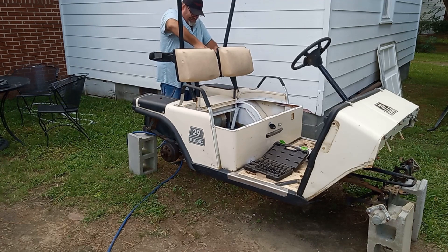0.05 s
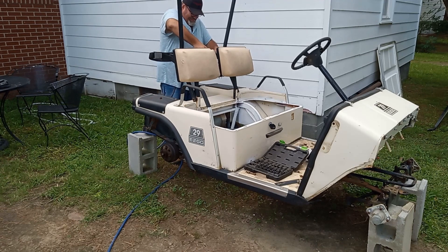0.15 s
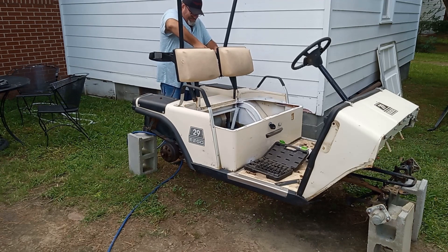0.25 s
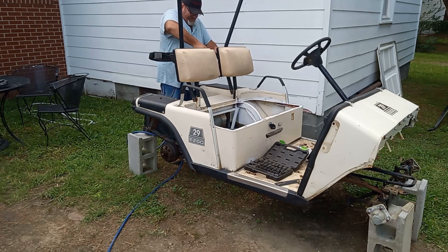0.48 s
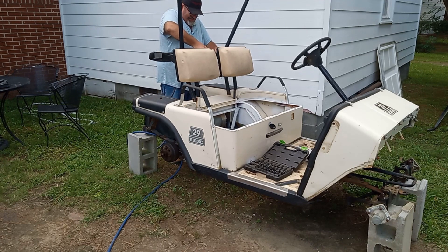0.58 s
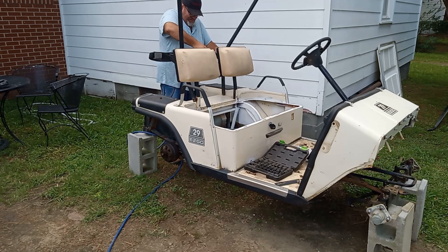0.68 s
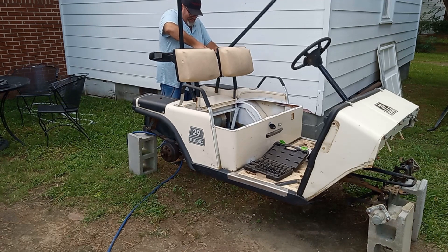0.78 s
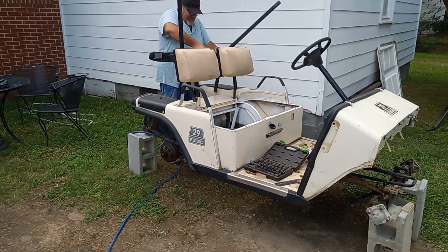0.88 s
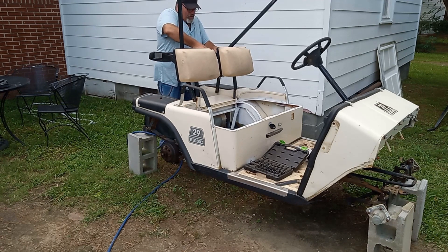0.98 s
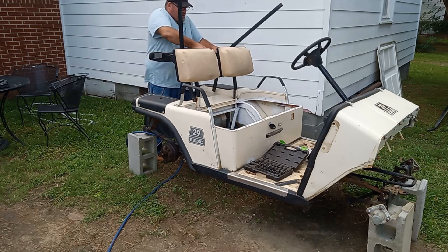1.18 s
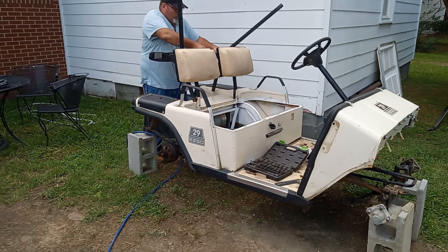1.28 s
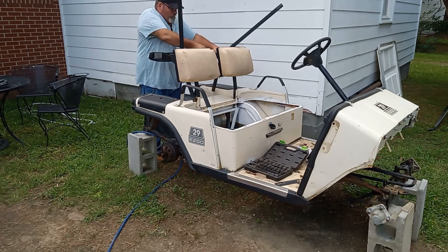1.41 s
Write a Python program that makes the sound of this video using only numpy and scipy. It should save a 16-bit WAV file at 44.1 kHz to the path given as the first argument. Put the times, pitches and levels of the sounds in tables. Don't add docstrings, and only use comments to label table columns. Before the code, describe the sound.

Steel rasps in its bracket, cracks loose and rattles the cart's panels; after a pause it thuds the drummy body, then taps it lightly. Insects hiss, distant machinery hums, and a nearby wall reflects the sound.

```python
import sys
import numpy as np
from scipy import signal
from scipy.fft import rfft, irfft
from scipy.io import wavfile
from scipy.ndimage import uniform_filter1d

SR = 44100
rng = np.random.default_rng(int(sys.argv[2]) if len(sys.argv) > 2 else 0)


def dump_mix(stems):
    frames = np.atleast_2d(stems).T
    limited = np.clip(frames, -1, 1)
    pcm = np.round(limited * 32767).astype(np.int16)
    wavfile.write(sys.argv[1], SR, pcm)


def boost(x):
    u = np.asarray(x, float) / 20
    return 10 ** u


N = 63945

SNAP_S, SWUNG_S, NUDGE_S = 0.287, 0.8, 1.293
HIT_SIZE = 12


def evened(x):
    return x / np.sqrt(np.mean(x ** 2) + 1e-20)


def read(points, hz):
    f, value = np.transpose(points)
    return np.interp(np.log(hz + 1), np.log(f + 1), value)


def slow_drift(hz):
    noise = rng.standard_normal(N + SR)
    return evened(signal.lfilter(*signal.butter(N=2, Wn=hz, fs=SR), noise)[SR:])


def noise_band(hz, width):
    r = np.exp(-np.pi * width / SR)
    z = rng.standard_normal((2, N)) + 1j * rng.standard_normal((2, N))
    for _ in range(2):
        z = signal.lfilter([1], [1, -r], z)
    return evened((z * np.exp(2j * np.pi * hz * np.arange(N) / SR)).real)


# (frequency [Hz], level [dB])
AIR_COLOUR = [(18, -31), (30, -6), (149, 2), (210, -10), (1040, -12), (5310, -34), (6720, -11.5),
              (7700, -53.5), (16000, -35.5)]
# (frequency [Hz], likeness [-1 to 1])
AIR_LIKENESS = [(60, 0.98), (240, 0.91), (950, -0.37), (3770, 0.23), (15000, 0.74)]


def air():
    hz = np.fft.rfftfreq(N + 1, 1 / SR)
    a, b = rfft(rng.standard_normal((2, N + 1)))
    same = np.clip(read(AIR_LIKENESS, hz), -1, 1)
    z = np.array([a, same * a + np.sqrt(1 - same ** 2) * b]) * boost(read(AIR_COLOUR, hz))
    middle = irfft(z[0] * ((hz > 200) & (hz < 5000))).std()
    return boost(-65) * irfft(z)[:, :N] / middle


# (frequency [Hz], width [Hz], level [dB])
HUM_LINES = [(72.4, 16, 1), (117.4, 17, -11.5), (146.4, 8.9, -7)]
# (time [s], level [dB])
HUM_SWELLS = [
    (0.0, -33.5),
    (0.068, -81),
    (0.188, -50),
    (0.35, -78),
    (0.532, -69.5),
    (0.836, -64.5),
    (0.968, -71),
    (1.21, -60.5),
    (1.352, -69),
    (1.45, -75),
]


def hum():
    s, level_db = np.transpose(HUM_SWELLS)
    lines = sum(boost(db) * noise_band(hz, width)[0] for hz, width, db in HUM_LINES)
    return lines * boost(np.interp(np.arange(N) / SR, s, level_db))


CRICKET_S, CRICKET_RISE_S = 1.205, 0.04
CHIRR_PER_S, CHIRR_FIRST_S, CHIRR_SHARP, CHIRR_BLURRED_S = 115.5, 1.229, 1.2, 1.43


def insects():
    t = np.arange(N) / SR
    hiss = noise_band(hz=6820, width=370)
    hiss = hiss + 0.86 * hiss[::-1]
    throb_db = -74.5 + 4 * slow_drift(hz=30)
    sharpness = np.clip((CHIRR_BLURRED_S - t) / (CHIRR_BLURRED_S - CRICKET_S), 0, 1)
    pulses = np.cos(2 * np.pi * CHIRR_PER_S * (t - CHIRR_FIRST_S))
    chirr = evened(np.exp(CHIRR_SHARP * sharpness * pulses))
    rise = np.clip((t - CRICKET_S) / CRICKET_RISE_S, 0, 1)
    cricket = rise * chirr * noise_band(hz=8650, width=1300)
    return hiss * boost(throb_db) + boost(-66) * cricket


# (frequency [Hz], likeness [0 to 1])
CART_LIKENESS = [(100, 0.97), (400, 0.86), (1200, 0.25), (3000, 0.13), (6000, 0.28), (10000, 1),
                 (15000, 0.78)]


def paired(z, hz):
    same = np.clip(read(CART_LIKENESS, hz), 0, 1)
    return np.array([z[0], same * z[0] + np.sqrt(1 - same ** 2) * z[1]])


# (frequency [Hz], time to fall 60 dB [s])
YARD_T60 = [(200, 0.55), (1500, 0.23), (6000, 0.58), (15000, 0.21)]


def yard(x):
    taps = np.zeros((2, SR))
    slots = np.arange(400, SR - 20, 20)
    at = slots + rng.integers(0, 20, (2, len(slots)))
    np.put_along_axis(taps, at, rng.choice([-1., 1.], at.shape), 1)
    hz, t, z = signal.stft(taps, SR, nperseg=256)
    dying = boost(-60 * t / abs(read(YARD_T60, hz))[:, None])
    tail = signal.istft(paired(z, hz[:, None]) * dying, SR, nperseg=256)[1]
    tail = boost(-11) * tail / np.linalg.norm(tail[0])
    wall = round(0.011 * SR)
    tail[[0, 1], [wall, wall + 9]] += boost(-14.5)
    return signal.fftconvolve(x, tail, axes=1)[:, :N]


def dense(x, colour, t60, count=6):
    t, hz = np.arange(4096) / SR, np.fft.rfftfreq(8192, 1 / SR)
    log_gain = np.log(boost(read(colour, abs(np.fft.fftfreq(8192, 1 / SR)))))
    tone = np.exp(np.conj(signal.hilbert(log_gain)))[:4097]
    fade = boost(-60 * t / t60) * np.minimum(t / .001, 1)
    patch, out = rng.integers(0, count, N), np.zeros((2, N))
    for k in range(count):
        burst = rfft(rng.standard_normal((2, 4096)) * fade, 8192)
        h = irfft(paired(burst, hz) * tone)
        h = h / np.linalg.norm(h, axis=1)[:, None]
        out += signal.fftconvolve((x * (patch == k))[None], h, axes=1)[:, :N]
    return out


def ringing(modes):
    t, h = np.arange(SR) / SR, np.zeros(SR)
    for k, (hz, db, t60) in enumerate(modes):
        h += boost(db - 60 * t / abs(t60)) * np.sin(2 * np.pi * hz * t) * (-1) ** k
    return h / np.linalg.norm(h)


def through(x, h):
    return signal.fftconvolve(x, h)[:N]


# (time [s], level [dB])
RUB_PRESS = [(0.144, -91), (.19, -56.5), (.3, -43), (0.57, -87), (0.641, -99.5), (0.674, -74), (.71, -97),
             (.985, -90), (1.01, -53), (1.09, -63.5), (1.133, -77), (1.14, -56.5), (1.2, -82),
             (1.275, -73.5), (1.294, -72), (1.316, -58.5), (1.362, -86), (1.45, -78)]
# (frequency [Hz], level [dB])
RUB_TONE = [(5000, -37), (8000, -12), (9500, -1), (12500, -6.5), (15000, 0)]
RUB_DB, RUB_CEILING_DB = 5, -57.5


def rub():
    s, level_db = np.transpose(RUB_PRESS)
    level_db = np.interp(np.arange(N) / SR, s, level_db, -95)
    press = boost(RUB_DB + np.minimum(level_db, RUB_CEILING_DB))
    grains = evened(rng.standard_normal(N) * (rng.random(N) < .3))
    return dense(press * grains, RUB_TONE, t60=0.0047)


# (time [s], level [dB], contact time [s])
BRACKET_TAPS = [
    (1.309, -47, 0.000045),
    (1.312, -52.5, 0.000066),
    (1.316, -53, 0.000044),
    (1.334, -55, 0.000051),
    (1.347, -51.5, 0.000086),
]
# (frequency [Hz], level [dB], time to fall 60 dB [s])
BRACKET_MODES = [(437.5, 3, 0.14), (665, -1.5, 0.1), (1440, -14, 0.075), (2540, -20, .06),
                 (3350, -4.5, 0.047), (3960, -12.5, .16), (4050, -3.5, 0.088), (6000, 6, 0.04),
                 (6040, 7.5, 0.047)]
# (frequency [Hz], level [dB], time to fall 60 dB [s])
CLASP_MODES = [(1480, 14, 0.023), (1150, 0.5, .014), (456, -9, .03)]


def bracket():
    x, t = np.zeros(N), np.arange(N) / SR
    for s, db, contact in BRACKET_TAPS:
        push = np.exp(-((t - s) / (contact / 2)) ** 2)
        x += HIT_SIZE * boost(db) * push / push.sum()
    tick = HIT_SIZE * (np.arange(N) == round(.212 * SR))
    return through(x, ringing(BRACKET_MODES)) + boost(-49) * through(tick, ringing(CLASP_MODES))


# (time [s], slips on steel [dB], load on the body [dB])
WRENCH_FORCE = [
    (.185, -71.5, -68),
    (.226, -47, -53),
    (.233, -35, -39.5),
    (.27, -27, -33),
    (.283, -31.5, -37.5),
    (.293, -28.5, -35.5),
    (.31, -31.5, -33),
    (.385, -44, -33),
    (.63, -80, -68),
]
# (time [s], slips on steel [dB], load on the body [dB])
KNOCK_FORCE = [
    (0.995, -44.5, -42.5),
    (1.003, -42, -44.5),
    (1.04, -41, -38),
    (1.11, -59.5, -44),
    (1.149, -69, -55),
    (1.199, -91, -75),
    (1.25, -84, -70),
    (1.275, -74, -87),
]
# (time [s], slips on steel [dB], load on the body [dB])
NUDGE_FORCE = [
    (1.295, -72, -62.5),
    (1.313, -60, -59),
    (1.345, -71, -63),
    (1.385, -80, -81),
    (1.45, -72, -72),
]


def train(per_s, spread_db, column):
    t = np.arange(N) / SR
    size = boost(spread_db * np.minimum(rng.exponential(1, N), 4))
    size = size * rng.choice([-1, 1], N) * (rng.random(N) < per_s / SR)
    force = np.zeros(N)
    for curve in (WRENCH_FORCE, KNOCK_FORCE, NUDGE_FORCE):
        c = np.array(curve)
        force += boost(np.interp(t, c[:, 0], c[:, column], -150, -150))
    return evened(size) * force


# (time [s], blow on steel [dB], blow on the body [dB])
HARD_BLOWS = [(0.2291, -34, -69), (0.2454, -36, -37), (0.2636, -25.5, -54), (0.2665, -23, -35),
              (0.273, -30, -32), (0.2875, -22.5, -57), (0.2879, -16, -49), (.2925, -23, -44),
              (0.2963, -23.5, -51), (0.298, -27, -52), (.304, -29, -63), (.314, -38.5, -32),
              (.324, -28, -51), (0.35, -36, -33), (.363, -38, -35), (0.382, -56, -32), (0.6012, -90, -52),
              (0.9932, -34, -41), (.9965, -42.5, -53), (1.002, -67, -32), (1.01, -41, -46),
              (1.021, -53, -29), (1.029, -37, -39), (1.038, -57, -33), (1.056, -61, -33),
              (1.065, -59, -34.5), (1.109, -63.5, -46), (1.145, -73, -49.5), (1.192, -83, -52.5),
              (1.229, -83, -59), (1.302, -58, -70), (1.309, -61, -54)]


def blows(column):
    x = np.zeros(N)
    for row in HARD_BLOWS:
        x[round(row[0] * SR)] = HIT_SIZE * boost(row[column])
    return x


# (time [s], level [dB])
FRAME_THUDS = [
    (1.0135, -41),
    (1.0414, -39.5),
    (1.097, -47),
    (1.295, -57),
]
# (frequency [Hz], level [dB], time to fall 60 dB [s])
FRAME_MODES = [(107.5, 0, .24), (155, -12, .12)]


def frame():
    x = np.zeros(N)
    for s, db in FRAME_THUDS:
        x[round(s * SR)] = HIT_SIZE * boost(db)
    return through(x, ringing(FRAME_MODES))


# (frequency [Hz], level [dB])
SHELL_TONE = [(47, -61), (80, -14.5), (672, -2.5), (733, -1), (886, -7), (983, -7.5), (2110, -16.5),
              (5000, -19), (6500, -52.5), (11000, -120)]
# (frequency [Hz], level [dB], time to fall 60 dB [s])
PANEL_MODES = [(339.5, 0, 0.2), (391, -1, 0.23), (482, 8.5, 0.21), (523, -10, 0.076), (644, -16, .1),
               (723, -6, 0.078), (840.7, 0.5, 0.19), (968, -7.5, 0.12), (1095, 1.5, 0.12),
               (1320, -5, 0.0793), (1474, 1, 0.1005), (1698, 1.5, 0.078), (1920, -9.5, 0.056)]
# (frequency [Hz], level [dB])
PAN_TONE = [(29, -40), (50, -21), (107, 2.5), (150, -5.5), (264, 1.5), (418, -4), (532, -5), (6000, -36.5),
            (7800, -78), (13200, -120)]
# (frequency [Hz], level [dB], time to fall 60 dB [s])
PAN_MODES = [(170, -6, 0.076), (199, 9, 0.14), (258.6, 4.5, 0.34), (328, 6, 0.058), (393, -0.5, 0.45),
             (469, -0.5, 0.2), (505, -2, 0.11), (670, 0.5, 0.044), (740, -0.5, 0.11), (876, -3, .12),
             (997, -17, 0.19), (1030, -6, 0.053), (1240, -6, 0.057)]
# (frequency [Hz], level [dB], time to fall 60 dB [s])
WIDE_MODES = [(212.7, 0.26, .16), (277.8, 2.7, .2)]


def body():
    t = np.arange(N)
    load = train(per_s=1200, spread_db=2.0, column=2) + blows(column=2)
    knocked = (t > SWUNG_S * SR) & (t < NUDGE_S * SR)
    side_load, pan_load = load * ~knocked, load * knocked
    panels = dense(side_load, SHELL_TONE, t60=0.034) + boost(-3) * through(side_load, ringing(PANEL_MODES))
    pan = dense(pan_load, PAN_TONE, t60=0.036) + boost(-2.5) * through(pan_load, ringing(PAN_MODES))
    wide = boost(-14) * through(side_load * (t > SNAP_S * SR), ringing(WIDE_MODES))
    return panels + pan + wide + frame()


# (frequency [Hz], level [dB])
RASP_TONE = [(300, -43.5), (1000, -6.5), (2200, -2), (4200, -3.5), (6000, 1), (7800, -14.5), (9300, -5),
             (13000, -20), (15200, -6.5)]
# (frequency [Hz], level [dB])
HELD_TONE = [(300, -39), (1500, 10), (2500, -1), (5000, 0.5), (7500, -11), (11500, -15.5), (13000, -21),
             (15000, -8)]
# (frequency [Hz], level [dB])
FREE_TONE = [(1500, -20.5), (5800, -13.5), (8300, -17.5), (10200, -6.5), (10900, -1), (11500, -13),
             (13800, -15.5), (15100, -2.5)]
FREE_HZ = [5240, 5654, 5783, 5944, 6907, 7660, 9349, 9947, 10839, 10904, 11023, 14870, 15216, 15480]
# (level [dB], time to fall 60 dB [s])
FREE_DECAY = [(-15, .12), (-11.5, 0.49), (-4, 0.14), (-7, 0.066), (-7.5, 0.11), (-5, 0.039), (-12, 0.18),
              (-23, .14), (4, 0.039), (3, 0.098), (0.5, 0.055), (-8, 0.0708), (-10, 0.031), (-16, .1)]
# (frequency [Hz], level [dB], time to fall 60 dB [s])
HELD_MODES = [(1425, -3, 0.066), (1580, -0.5, 0.028), (2030, -22, 0.029), (2540, 2, 0.042),
              (3550, -4, 0.036), (4550, -8, 0.034), (4800, -4, 0.034), (5570, -6, 0.07), (7700, -23, .04)]
# (frequency [Hz], level [dB], time to fall 60 dB [s])
WEDGED_MODES = [(2100, -3, 0.035), (2870, 0, .02), (4065, -0.5, 0.031), (4590, 3, 0.021),
                (5066, 1.5, 0.051), (6100, -5, 0.03), (6210, -4, 0.057), (9250, -2.5, .03),
                (15100, 0, .015)]
RING_SLIP_DB, RING_BLOW_DB, FREE_SLIP_DB = -7.5, -2.5, -5
RASP_BLOW_DB, FREE_RASP_DB = -9, -2
STEEL_T60 = 0.015


def strut():
    t = np.arange(N) / SR
    slips, hits = train(per_s=4000, spread_db=2.5, column=1), blows(column=1)
    wedged, free, swung = t <= SNAP_S, (t > SNAP_S) & (t < SWUNG_S), t >= SWUNG_S
    struck = boost(RING_SLIP_DB) * slips + boost(RING_BLOW_DB) * hits
    free_struck = boost(FREE_SLIP_DB + RING_SLIP_DB) * slips + boost(RING_BLOW_DB) * hits
    ring = through(free * free_struck, ringing(np.column_stack([FREE_HZ, FREE_DECAY])))
    ring = ring + boost(-2.5) * through(swung * struck, ringing(HELD_MODES))
    ring = ring + boost(-2) * through(wedged * struck, ringing(WEDGED_MODES))
    clatter = boost(5) * dense((slips + hits) * free, FREE_TONE, t60=0.021)
    scrape = slips + boost(RASP_BLOW_DB) * hits
    rasp = dense(scrape * ~swung * boost(FREE_RASP_DB * free), RASP_TONE, STEEL_T60)
    return ring + clatter + rasp + dense(scrape * swung, HELD_TONE, STEEL_T60)


def scene():
    side = np.array([[.5], [-.5]])
    steel = (strut() + bracket() + rub()) * boost(-1 * side)
    cart = steel + body() * boost(1.5 * side)
    return air() + hum() + insects() + yard(cart) + cart


def roll_off(x):
    return signal.sosfilt(signal.butter(12, 16760, fs=SR, output="sos"), x)


DUCK_FROM_DB, DUCK_SHARE, DUCK_BACK_DB_PER_S = -41, 0.085, 24.5


def record(dry):
    power_db = 10 * np.log10(abs(uniform_filter1d((dry ** 2).mean(0), 400)) + 1e-12)
    fall = np.arange(N) * DUCK_BACK_DB_PER_S / SR
    held_db = np.maximum.accumulate(power_db + fall) - fall
    over_db = np.maximum(held_db - DUCK_FROM_DB, 0)
    x = signal.lfilter(*signal.butter(N=2, Wn=70, btype="high", fs=SR), dry)
    x = x / boost(DUCK_SHARE * uniform_filter1d(over_db, 200))
    top_edge = signal.firwin(511, 15800, window=("kaiser", 9), fs=SR)
    return roll_off(signal.oaconvolve(x, top_edge[None], "same"))


dry = scene()
out = record(dry)
dump_mix(out)
```